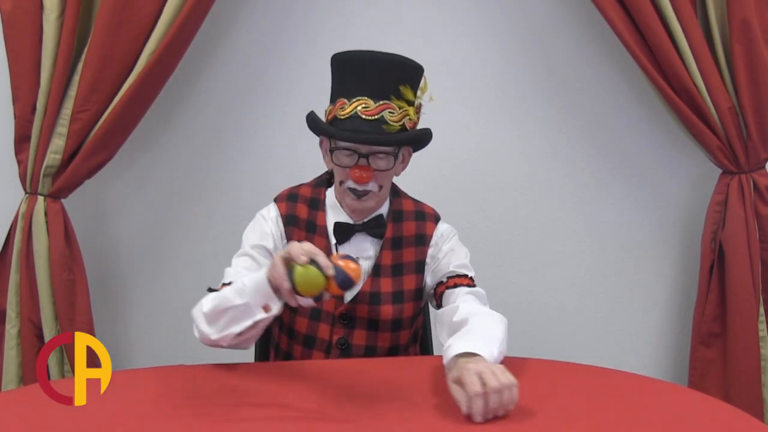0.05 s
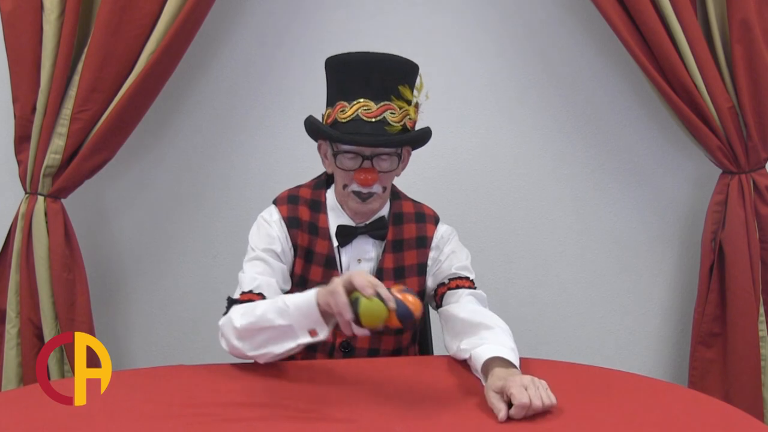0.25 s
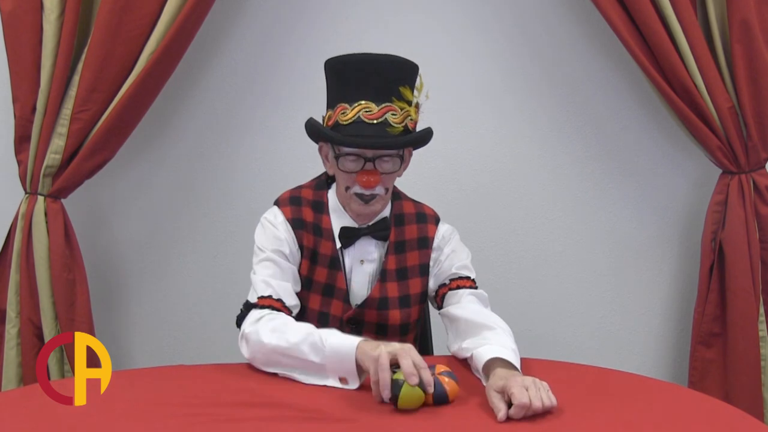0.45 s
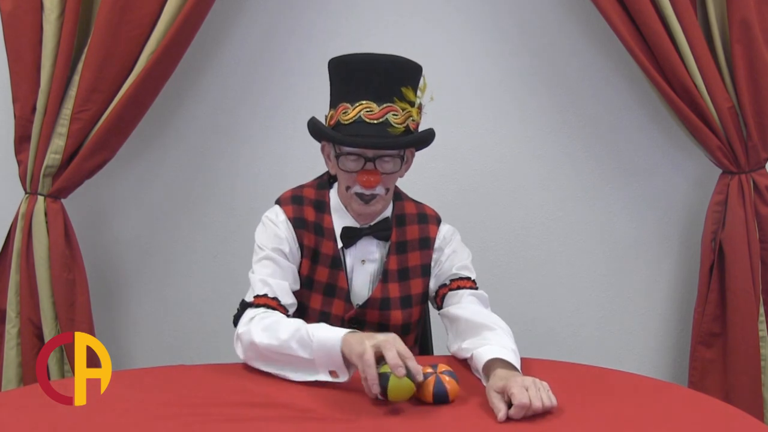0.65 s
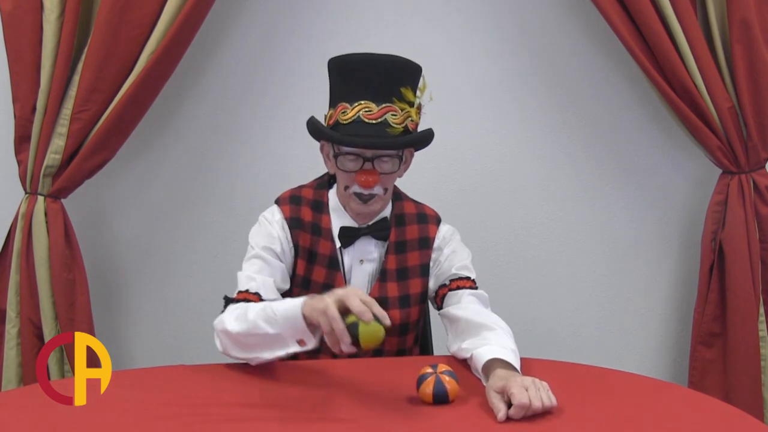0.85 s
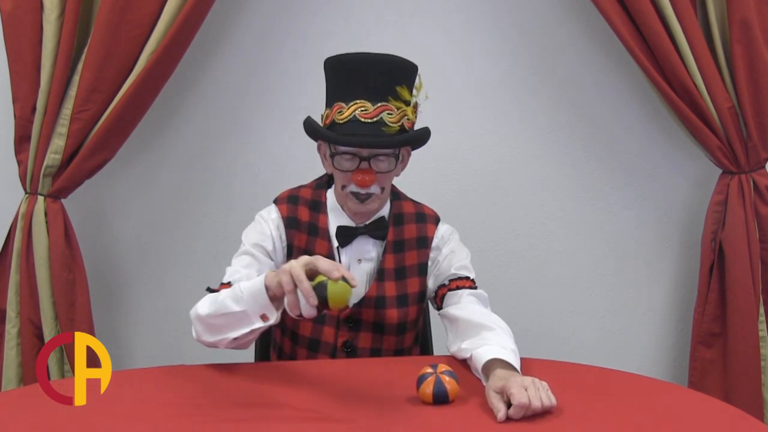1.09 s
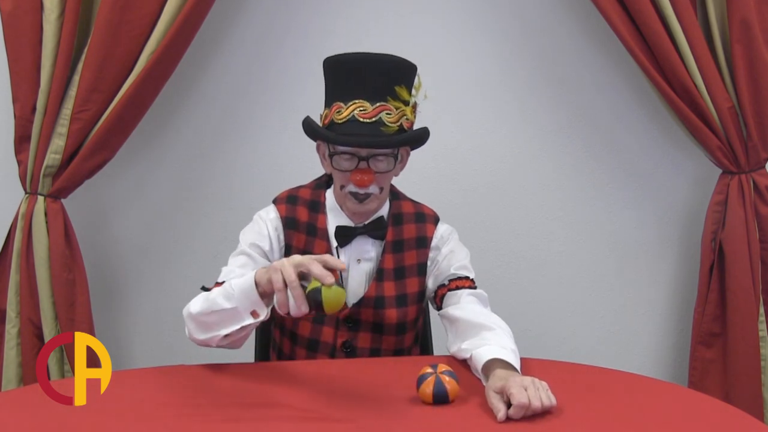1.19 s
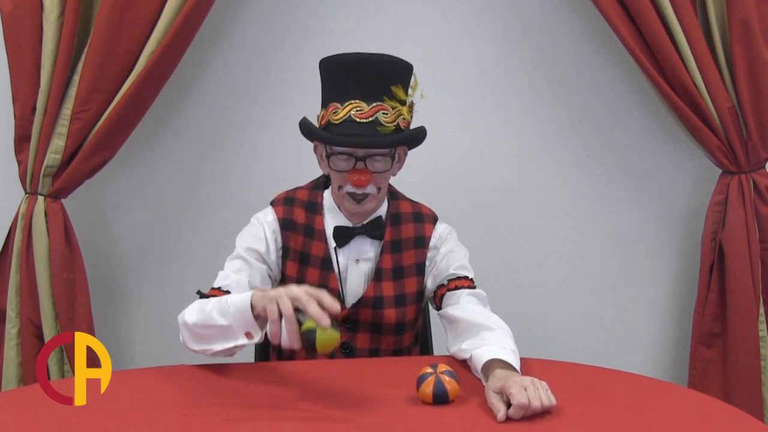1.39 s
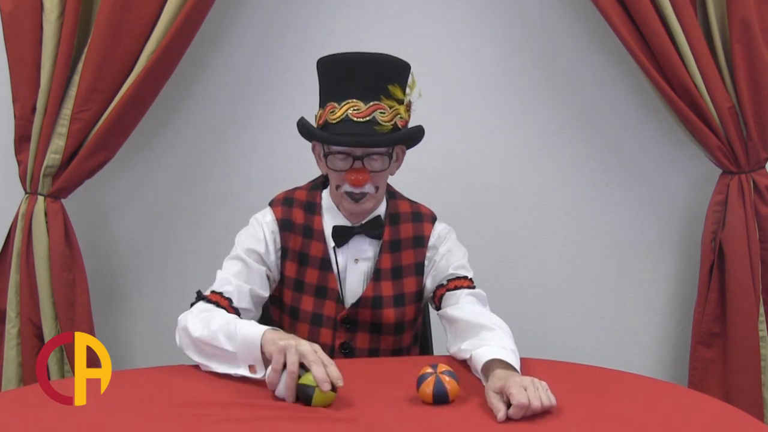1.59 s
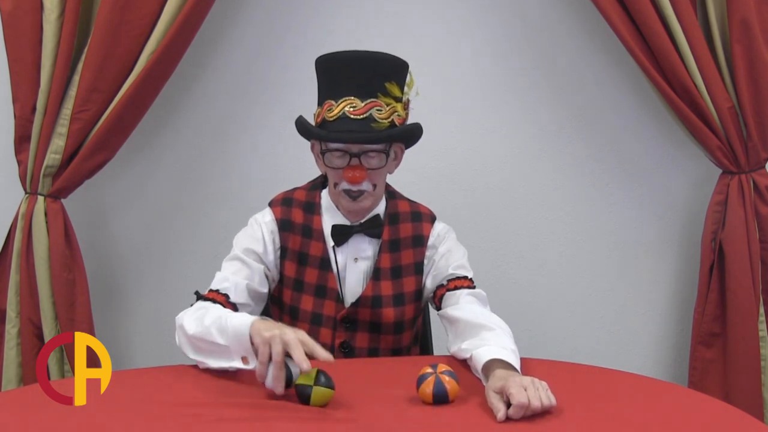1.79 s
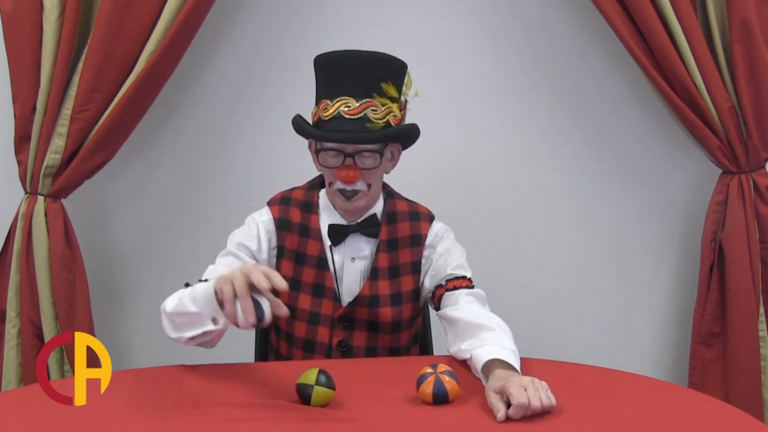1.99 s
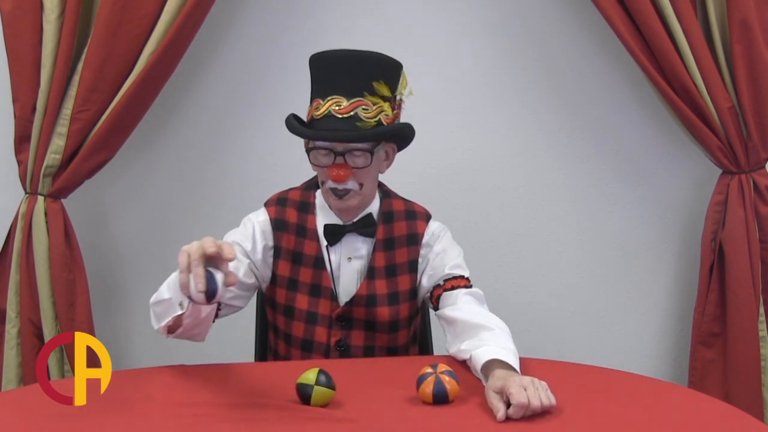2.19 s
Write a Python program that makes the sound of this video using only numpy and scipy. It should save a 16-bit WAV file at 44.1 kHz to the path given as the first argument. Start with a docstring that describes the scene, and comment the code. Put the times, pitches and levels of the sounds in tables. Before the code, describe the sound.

Three dull, close thuds sound as beanbag balls meet a covered table, the first two near together, each with a brief crunch of beans. Faint sleeve rustle and the low hiss of a small room fill the gaps.

```python
"""Low room rumble, hiss and the faint brush of a sleeve come first, in a small room.
Close to the stereo microphone, a little to the right, beanbag balls are set down three times
on a cloth-covered table. Each landing pushes the table top into a dull thud, over a low boom of
the room, while the filling crunches, clicks and settles. The sleeve brushes on between and after."""
import sys
import numpy as np
from scipy import signal
from scipy.fft import rfft, irfft, next_fast_len
from scipy.io import wavfile

SR = 44100
rng = np.random.default_rng(int(sys.argv[2]) if len(sys.argv) > 2 else 0)


def bounce(signal):
    """Save signal as a 16-bit WAV file at the path given by the first command-line argument."""
    frames = np.transpose(np.atleast_2d(signal))
    limited = np.clip(frames, -1, 1)
    pcm = np.round(limited * 32767).astype(np.int16)
    wavfile.write(sys.argv[1], SR, pcm)


N = 99225
TIME = np.arange(N) / SR
PADDED = next_fast_len(N + SR)
FREQS = np.maximum(np.arange(PADDED // 2 + 1) * SR / PADDED, 1)


def from_db(db):
    """Decibels to gain."""
    return 10 ** (np.asarray(db) / 20)


def unit_rms(x):
    """Scale to unit rms."""
    return x / np.sqrt(np.mean(x ** 2) + 1e-20)


def at_hz(points, hz):
    """Read a table on a log-frequency axis."""
    point_hz, values = np.transpose(points)
    return np.interp(np.log(hz), np.log(point_hz), values)


def colour(x, spectrum):
    """Causal (minimum-phase) filter with the given spectrum."""
    cepstrum = irfft(np.log(from_db(at_hz(spectrum, FREQS))), PADDED)
    fold = 1 + np.sign(np.arange(PADDED // 2))
    response = np.exp(rfft(cepstrum[:PADDED // 2] * fold, PADDED))
    return irfft(rfft(x, PADDED) * response, PADDED)[..., :N]


def low_pass(x, hz):
    """Gentle treble cut."""
    return signal.sosfilt(signal.butter(2, hz, fs=SR, output="sos"), x + 1e-18)


def fade(start, decay_s):
    """Exponential decay from a start time."""
    return (TIME >= start) * np.exp(-np.maximum(TIME - start, 0) / decay_s)


def wide_noise(width):
    """Stereo noise whose width depends on frequency."""
    mid, side = rng.standard_normal((2, N))
    return mid + colour(side, width) * np.array([[1], [-1]])


# The still room at the microphone. Each row: frequency in Hz, relative level in dB.
ROOM_TONE_SPECTRUM = [(15, -21), (25, -10.5), (59, -8), (160, -9.5), (281, -14), (313, -12.5), (340, -22),
                      (368, -16.5), (552, -16), (598, -16.5), (895, -20), (4620, -26.5), (15500, -35.5)]
# Stereo width of room tone and sleeve. Each row: frequency in Hz, side over mid in dB.
AMBIENT_WIDTH = [(60, -18), (200, -5.5), (500, 1), (1200, -3), (12000, -7.5)]


def room_tone(level_db=-56.5):
    """Steady rumble and hiss around the microphone, narrowest in the bass."""
    return from_db(level_db) * unit_rms(colour(wide_noise(AMBIENT_WIDTH), ROOM_TONE_SPECTRUM))


# A sleeve by the table. Each row: peak time, rise and fall in seconds, rub and rustle levels in dB.
SLEEVE_BRUSHES = [(0.08, 0.099, 0.51, -63, -59), (1.10, 0.056, 0.141, -55, -67.5),
                  (1.243, 0.0074, 0.049, -62.5, -58.5), (1.33, .1, 0.1, -63.5, -67.5),
                  (1.845, 0.0099, 0.043, -59.5, -60.5)]
# The cloth's low rub and light rustle. Each row: frequency in Hz, relative level in dB.
RUB_SPECTRUM = [(40, -31), (120, -22), (250, -10), (375, 3), (470, -10), (560, -7), (900, -16.5),
                (2000, -38)]
RUSTLE_SPECTRUM = [(400, -5), (900, 3), (2300, 0.5), (4500, -4.5), (8000, -10), (15000, -26.5)]


def sleeve():
    """Brushing cloth swells and fades with the arm."""
    rub = unit_rms(colour(wide_noise(AMBIENT_WIDTH), RUB_SPECTRUM))
    rustle = unit_rms(colour(wide_noise(AMBIENT_WIDTH), RUSTLE_SPECTRUM))
    out = np.zeros((2, N))
    for peak, rise_s, fall_s, rub_db, rustle_db in SLEEVE_BRUSHES:
        swell = np.exp(-np.maximum((peak - TIME) / rise_s, (TIME - peak) / fall_s))
        out += swell * (from_db(rub_db) * rub + from_db(rustle_db) * rustle)
    return out


def grains(spread_db, per_second=7000):
    """Dense random bean collisions of uneven size."""
    sizes = from_db(spread_db * np.minimum(rng.exponential(1, N), 4))
    signs = rng.choice([-1, 1], N)
    return sizes * signs * (rng.random(N) < per_second / SR)


# Balls landing near the microphone. Each row: start in seconds, push in dB, contact in seconds,
# settling in dB, crunch in dB, crunch decay in seconds, slap over crunch in dB, crunch cutoff in Hz.
BALL_LANDINGS = [(0.2160, -33.5, 0.0024, -38.5, -49, 0.031, -12, 2470),
                 (0.5639, -32.5, 0.003, -39.5, -43.5, 0.0194, 3.5, 9680),
                 (1.6383, -32.5, 0.002717, -43.5, -46.5, 0.035, -5, 14000)]
# Beans settling and crunching, close up. Each row: frequency in Hz, relative level in dB.
SETTLE_SPECTRUM = [(35, 2.5), (75, -2.5), (120, 0.5), (190, -2.5), (330, -3), (450, -3.5), (700, -3.5),
                   (1000, -7.5), (1600, -15), (3000, -33.5), (9000, -48)]
CRUNCH_SPECTRUM = [(300, 6.5), (900, 7.5), (1600, 5.5), (3000, 2.5), (4500, 0), (8000, -4), (12000, -11),
                   (16000, -15.5)]


def filling(settle_rise_s=0.006, settle_decay_s=0.029, touch_rise_s=0.00077, slap_decay_s=0.0035):
    """The beans slap against the cover, crunch, and slump onto the table."""
    out = np.zeros(N)
    for start, _, _, settle_db, crunch_db, crunch_s, slap_db, cutoff_hz in BALL_LANDINGS:
        touch = start - 0.0027   # the cover touches just before the weight arrives
        slump = fade(touch, settle_decay_s) * (1 - fade(touch, settle_rise_s))
        settling = unit_rms(colour(grains(spread_db=2.5), SETTLE_SPECTRUM))
        out += from_db(settle_db) * slump * settling
        slap = from_db(slap_db) * fade(touch, slap_decay_s)
        burst = (fade(touch, crunch_s) + slap) * (1 - fade(touch, touch_rise_s))
        crunch = unit_rms(low_pass(colour(grains(spread_db=4), CRUNCH_SPECTRUM), cutoff_hz))
        out += from_db(crunch_db) * burst * crunch
    return out


def push(start, contact_s):
    """Force of a soft contact: quick rise, slower release, unit area."""
    force = np.maximum(TIME - start, 0) * fade(start, contact_s / 2 / np.pi)
    return force / (force.sum() + 1e-20)


def ring(force, hz, t60):
    """One mode: a unit click rings as a dying cosine of height 1."""
    radius = np.exp(-np.log(1000) / (t60 * SR))
    pole_real = radius * np.cos(2 * np.pi * hz / SR)
    return signal.lfilter([1, -pole_real], [1, -2 * pole_real, radius ** 2], force + 1e-18)


# Resonances of the thud: the table top's ring and, lowest, a boom of the room. Each row: frequency
# in Hz, seconds to fall 60 dB, then gain in dB for a landing at the first, second and third spot.
THUD_RESONANCES = [(76.76, 0.42, -38, -16, -19), (102.02, 0.46, -31, -27, -30), (154.5, 0.46, -3, -20, -28),
                   (176.97, 0.353, -4, -6, -2.5), (203.4, 0.47, 6, 0.5, 2), (238.5, 0.44, -4.5, -15.5, -18),
                   (257.7, 0.12, -35, 5.5, -3), (298.6, 0.4, -28, -4, -5.5), (369, 0.18, -2, -8, -8),
                   (423, 0.36, -3.5, -12, -3.5), (503, 0.1, 3.5, -5.5, -22), (543, 0.23, -5, -24, -28),
                   (912, 0.046, 7.5, 8.5, -3.5), (1134, 0.123, 0.5, 2.5, 2.5)]


def landing_thuds():
    """Each landing rings the table top and a low room boom, according to the spot it meets."""
    out = np.zeros(N)
    for spot, (start, push_db, contact_s, *_) in enumerate(BALL_LANDINGS):
        force = from_db(push_db) * push(start, contact_s)
        for hz, t60, *spot_db in THUD_RESONANCES:
            out += from_db(spot_db[spot]) * ring(force, hz, t60)
    return out


# Single clicks, close up. Each row: start in seconds, strength in dB, pitch in Hz, rise in seconds.
BEAN_CLICKS = [(0.2166, -40, 2279, 0.00055), (0.2357, -32, 3144, 0.00036), (0.5630, -40.5, 2780, 0.00033),
               (1.2380, -53.5, 2280, .0015)]


def bean_clicks():
    """Short rounded clicks of beans knocking together inside the cover."""
    out = np.zeros(N)
    for start, db, hz, rise_s in BEAN_CLICKS:
        age = TIME - start
        swell = np.e * age / rise_s * fade(start, rise_s)
        out += from_db(db) * swell * np.sin(2 * np.pi * hz * age)
    return low_pass(out, hz=5000)


# Near walls, heard from the microphone. Each row: delay in seconds, gain in dB.
WALL_ECHOES = [(0.0038, -5), (0.0108, 0.26), (0.016, -2.5), (0.0284, 1.5), (0.041, -13), (0.0512, -6),
               (0.0765, -10.5), (0.083, -9.5)]


def wall_echoes(thuds):
    """The walls return a few dull early reflections of the thuds."""
    dull = low_pass(thuds, hz=945)
    return sum(from_db(db) * np.interp(TIME - delay, TIME, dull, left=0) for delay, db in WALL_ECHOES)


# The tail's width at the microphone. Each row: frequency in Hz, side over mid in dB.
TAIL_WIDTH = [(60, -17.5), (180, -24), (300, -6), (600, -6.5), (1200, -2), (12000, -5.5)]
# The small room's decay. Each row: frequency in Hz, seconds to fall 60 dB.
TAIL_T60 = [(60, 1), (170, 0.63), (420, 0.26), (1100, 0.263), (3000, 0.1591), (10000, .24)]
# How much of each thud carries into the tail. Each row: frequency in Hz, gain in dB.
THUD_INTO_TAIL = [(70, -21), (190, -16), (300, -8), (600, -3), (900, -6), (1500, -1)]


def room_tail(thuds, beans, beans_db=-3, onset_s=0.00463):
    """Thuds and beans spread into a diffuse tail that dies band by band, longest in the bass."""
    noise_spectrum = rfft(wide_noise(TAIL_WIDTH), PADDED)
    edges_hz = np.geomspace(30, 18000, 13)
    tail = np.zeros((2, N))
    for low, high in zip(edges_hz, edges_hz[1:]):
        band = irfft(noise_spectrum * ((FREQS >= low) & (FREQS < high)), PADDED)[:, :N]
        t60 = at_hz(TAIL_T60, np.sqrt(low * high))
        tail += band * fade(0, t60 / np.log(1000))
    tail = unit_rms(tail * (1 - fade(0, onset_s))) / np.sqrt(N)   # unit energy
    source = colour(thuds, THUD_INTO_TAIL) + from_db(beans_db) * beans
    return signal.fftconvolve(source[None], tail, axes=1)[:, :N]


def scene(right_over_left_db=1.43):
    """The microphone faces the table, with the balls a little to its right and the room all around."""
    thuds = landing_thuds()
    beans = filling() + bean_clicks()
    pan = from_db([[-right_over_left_db / 2], [right_over_left_db / 2]])
    near = (thuds + wall_echoes(thuds) + beans) * pan
    return near + room_tail(thuds, beans) + room_tone() + sleeve()


def record(dry, cutoff_hz=15600):
    """The top of the microphone's signal is cut steeply."""
    return signal.sosfilt(signal.ellip(12, .1, 80, cutoff_hz, fs=SR, output="sos"), dry)


dry = scene()
out = record(dry)
bounce(out)
```